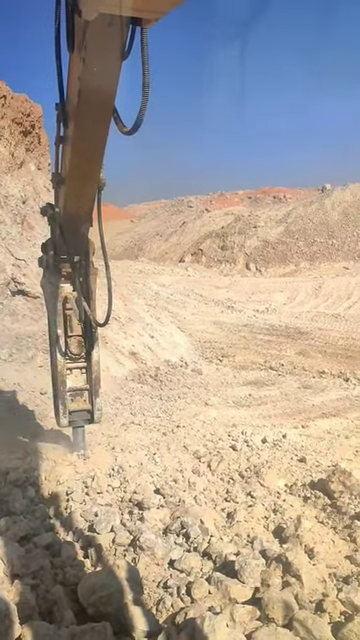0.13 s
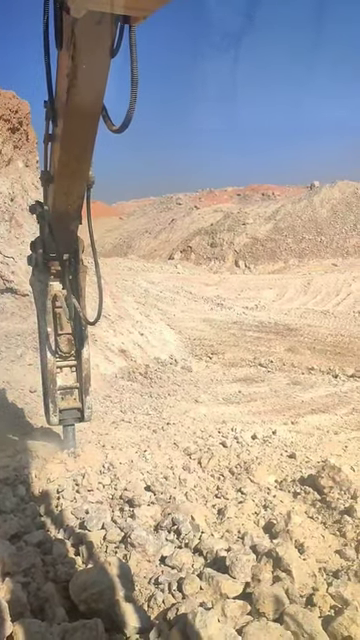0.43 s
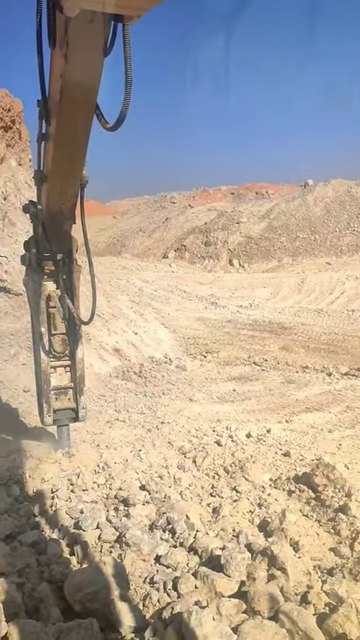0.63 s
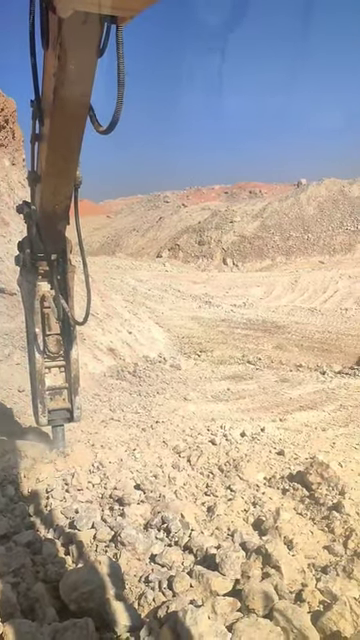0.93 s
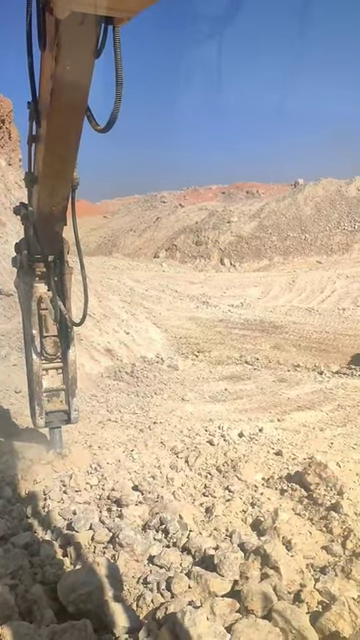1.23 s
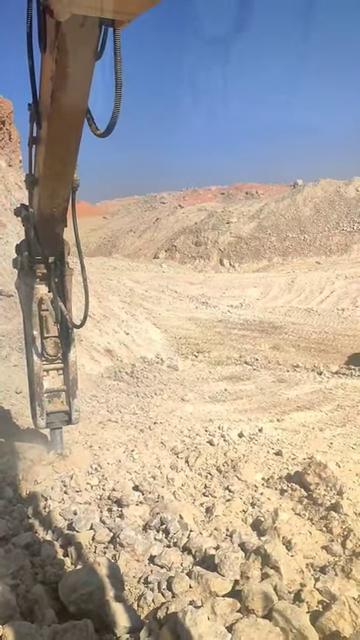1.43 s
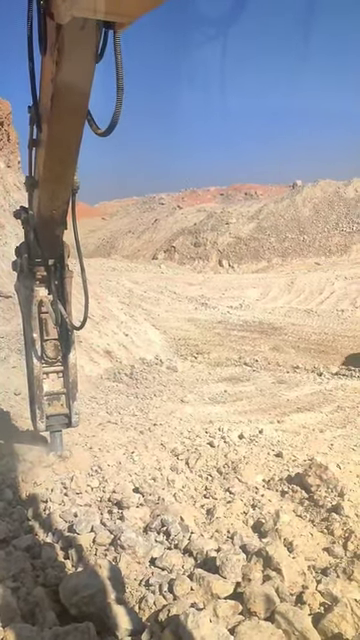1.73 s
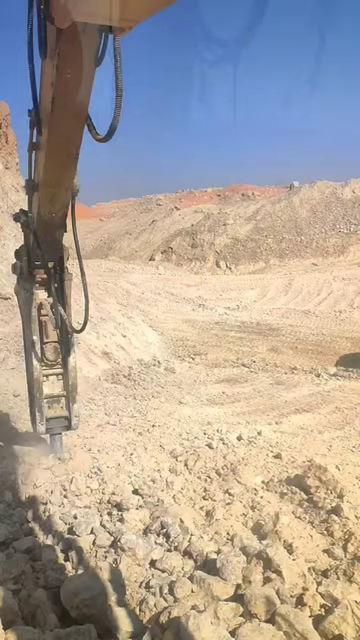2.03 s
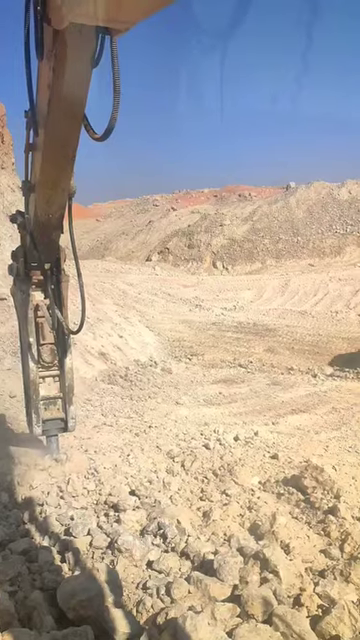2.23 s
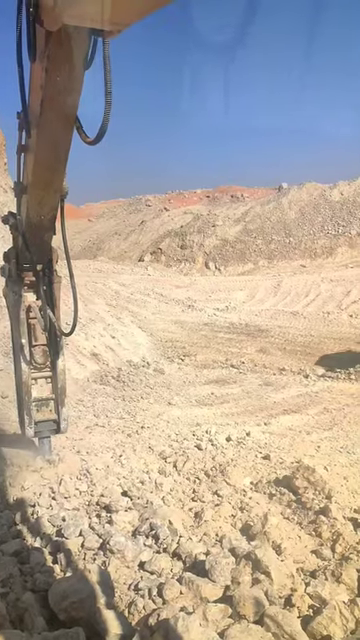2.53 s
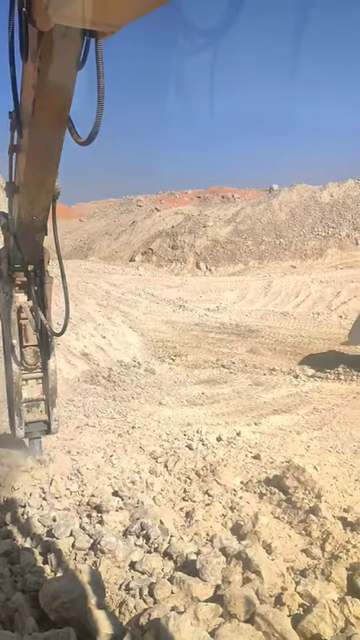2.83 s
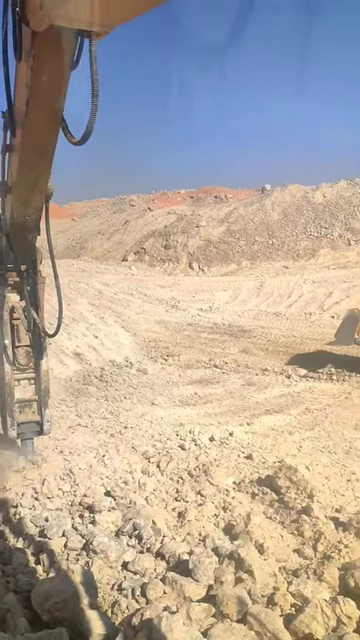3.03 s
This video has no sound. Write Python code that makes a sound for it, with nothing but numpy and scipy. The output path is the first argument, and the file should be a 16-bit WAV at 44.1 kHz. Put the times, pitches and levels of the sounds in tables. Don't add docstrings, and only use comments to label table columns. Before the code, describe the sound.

A hydraulic breaker hammers rock without pause for about 3.2 seconds, eight blows a second, heard in the closed excavator cab. Each blow is a deep boomy thump with a short coarse clatter of housing, panels and door. Steel rings thinly on the rebound and a pin sings high between blows. From about 1.9 seconds the rock splits; clatter strengthens and becomes choppier. Diesel and pump drone low throughout.

```python
import sys
import numpy as np
from scipy import signal
from scipy.fft import rfft, irfft, next_fast_len
from scipy.io import wavfile
from scipy.ndimage import uniform_filter1d, map_coordinates

SR = 44100
rng = np.random.default_rng(int(sys.argv[2]) if len(sys.argv) > 2 else 0)


def output_pcm(signal):
    pcm = np.clip(np.atleast_2d(signal).T, -1, 1) * 32767
    wavfile.write(sys.argv[1], SR, np.round(pcm).astype(np.int16))


def amplitude_ratio(level_db):
    exponent = np.asarray(level_db, float) / 20
    return 10 ** exponent


N = 140238
TIME = np.arange(N) / SR


def unit(x):
    return x / np.sqrt(np.mean(x ** 2) + 1e-20)


def along(points, hz):
    f, v = np.transpose(points)
    return np.interp(np.log(hz + 1), np.log(f + 1), v)


def wobble(rate):
    knots = rng.standard_normal(int(N * rate / SR) + 4)
    return map_coordinates(knots, [np.arange(N) * rate / SR])


def filtered(x, response):
    m = next_fast_len(N + SR // 2)
    return irfft(rfft(x, m) * response(np.fft.rfftfreq(m, 1 / SR)), m)[..., :N]


def rung(x, response):
    size = np.sqrt(np.mean(np.abs(response(np.fft.rfftfreq(SR, 1 / SR))) ** 2))
    return filtered(x, response) / size


def ringing(peaks):
    def response(f):
        total = 0
        for k, (centre, width, db) in enumerate(peaks):
            loss = 1j * f * width
            total = total + (-1) ** k * amplitude_ratio(db) * loss / (centre * centre - f * f + loss)
        return total
    return response


# (time [s], looseness [0 firm - 1 loose])
ROCK_GIVE = [
    (0, 0.18),
    (1.3, 0.067),
    (1.9, 0.45),
    (2.15, 0.9),
    (3.18, 0.7),
]


def give(s):
    return np.clip(np.interp(s, *np.transpose(ROCK_GIVE)), 0, 1)


# (time [s], clatter level [dB], panel level [dB], tool ring level [dB])
BLOWS = [(-0.062, -36.5, -60, -43), (0.059, -37.5, -32, -51.5), (0.18, -37, -33, -52),
         (0.3, -38.0, -34, -52.5), (0.417, -37.5, -33.5, -53), (0.537, -38, -32.5, -53),
         (0.656, -40, -34, -54.5), (0.777, -37.5, -33, -54), (0.899, -39, -35.5, -57),
         (1.019, -38, -34, -58), (1.139, -38, -35.5, -56), (1.261, -39, -38, -55),
         (1.384, -39.5, -43.5, -58), (1.507, -38.5, -39.5, -53), (1.628, -39, -40, -53.5),
         (1.755, -39, -44, -50), (1.877, -38.5, -37, -54), (2.004, -36, -36, -55), (2.131, -37, -35, -52.5),
         (2.256, -35.5, -31, -49.5), (2.381, -36, -39, -50), (2.512, -36, -37, -50),
         (2.633, -35, -39, -48.5), (2.763, -36, -33, -56), (2.888, -36, -54, -54.5),
         (3.014, -35.5, -35, -49), (3.136, -37, -47, -52)]
# (frequency [Hz], t60 [s], level [dB], lag [s])
SWING_FIRM = [(13.5, .6, -10.3, .0504), (22.5, .21, -11.5, .0212), (35.7, .6, -15.6, .0176),
              (40.3, .6, -13.9, .0186), (50.5, .3, -19.3, .0087), (64.2, .29, -19.6, .01),
              (74.5, .52, -14.6, .0073), (83.1, .6, -24, .0038), (102, .41, -25.1, .0021)]
# (frequency [Hz], t60 [s], level [dB], lag [s])
SWING_CRACKING = [(13.5, .6, -8.2, .0434), (26.3, .6, -16.9, .0214), (31.6, .6, -17.2, .0103),
                  (39.6, .6, -17, .0172), (54.4, .6, -22, .002), (70.4, .6, -20.1, .0136),
                  (72.7, .6, -19, .0078), (88, .6, -26.4, .0063), (112.3, .6, -27.9, .0029)]
# (frequency [Hz], t60 [s], level [dB], lag [s])
SWING_LOOSE = [(13.5, .53, -7.6, .0362), (27.1, .6, -23.4, .0208), (31.7, .6, -16.3, .0103),
               (39.2, .6, -13.3, .0142), (65.7, .6, -25.3, .0076), (72, .6, -24.8, .0055),
               (94.1, .6, -27.2, .0087)]
# (frequency [Hz], t60 [s], level [dB], lag [s])
FLOOR_PLATE = [(164.5, 0.37, -34, 0.0019), (214.4, 0.25, -33, 0.00061), (249.8, 0.4, -32, 0.0021)]
CRACKING_S = [
    1.7,
    1.9,
    2.28,
    2.4,
]


def swing():
    swell_s, blow_gap_s = .012, .12
    t = np.arange(SR * 2 // 3) / SR
    earlier = [BLOWS[0][0] - k * blow_gap_s for k in (1, 2, 3)]
    hits = np.zeros(N + SR)
    hits[[round((s + 1) * SR) for s in earlier + [row[0] for row in BLOWS]]] = 1
    cracking = np.interp(TIME, CRACKING_S, [0, 1, 1, 0])
    loose = np.interp(TIME, CRACKING_S[2:], [0, 1])
    firm = 1 - cracking - loose
    out = 0
    for modes, share in ((SWING_FIRM, firm), (SWING_CRACKING, cracking), (SWING_LOOSE, loose)):
        shape = 0
        for hz, t60, db, lag in [*modes, *FLOOR_PLATE]:
            shape = shape + amplitude_ratio(db - 60 * t / t60) * np.sin(2 * np.pi * hz * (t - lag))
        shape = shape * (1 - np.exp(-t / swell_s))
        out = out + share * signal.fftconvolve(hits, shape)[SR:SR + N]
    return amplitude_ratio(1 + 0.25 * wobble(8.94)) * out


# (time [s], hold [s])
HOLD = [
    (0, 0.058),
    (1.9, 0.068),
    (2.35, 0.065),
    (2.6, 0.048),
    (3.18, .034),
]


def rattle(column, blow_db, rebound_db, lumpy_db, lumps, rows=BLOWS):
    lead_s, attack_s = 0.011, .023
    release_db_per_s, tail_db, tail_db_per_s = 602, -12, 174
    sag_firm, sag_loose = 63, 189
    rebound_s, rebound_spread_s, rebound_len_s = 0.045, 0.01, 0.0074
    s, level_db = np.transpose(rows)[[0, column]]
    luck = rng.standard_normal((len(s), 2))
    gain = np.zeros(N)
    for s0, db, (late, strong) in zip(s, level_db, luck):
        at = slice(max(round((s0 - lead_s) * SR), 0), round((s0 + .2) * SR))
        t = TIME[at] - s0
        after = np.clip(t - np.interp(s0, *np.transpose(HOLD)), 0, 1)
        sag = sag_firm + (sag_loose - sag_firm) * give(s0)
        attack = np.sin(np.pi / 2 * np.clip((t + lead_s) / attack_s, 0, 1)) ** 2
        hold = amplitude_ratio(blow_db - sag * t) * attack
        from_rebound = (t - rebound_s - rebound_spread_s * late) / rebound_len_s
        bump = amplitude_ratio(rebound_db + 0.53 * strong) * np.exp(-.5 * from_rebound ** 2)
        release = amplitude_ratio(-release_db_per_s * after) + amplitude_ratio(tail_db - tail_db_per_s * after)
        gain[at] += amplitude_ratio(db) * release * (hold + bump)
    lumpy = unit(amplitude_ratio(lumpy_db * wobble(lumps)))
    return gain * lumpy * rng.standard_normal((2, N))


def cab(x):
    t60_s, tail_db = .08, -8
    t = np.arange(SR // 5) / SR
    tail = rng.standard_normal((2, len(t))) * amplitude_ratio(-60 * t / t60_s)
    return x + amplitude_ratio(tail_db) * signal.fftconvolve(x, tail / np.linalg.norm(tail[0]), axes=1)[:, :N]


# (frequency [Hz], level [dB per Hz])
CLATTER = [(120, -120), (300, 10), (950, 6), (1150, -3), (2200, -2.5), (3200, 2.5), (3500, -6.5),
           (14000, -25)]
# (frequency [Hz], width [Hz], level [dB])
HOUSING = [(1085, 40, -3), (1385, 80, -4), (1642, 35, 2), (1980, 30, -6), (2500, 35, -5), (2695, 40, -4),
           (2865, 60, -4), (2965, 30, -6), (3045, 35, -5), (3610, 45, -6), (4020, 180, -13),
           (5140, 150, -14)]
# (frequency [Hz], width [Hz], level [dB])
PANELS = [(373, 28, -10.5), (401, 24, -5), (449, 20, 3.5), (504, 37, -4), (545, 21, -3), (643, 16, -1),
          (688, 21, -12), (741, 11, 1)]
# (time [s], peak level [dB], mean level [dB])
THUMPS = [(0.058, -26, -27), (0.178, -15, -27.5), (0.299, -25, -29), (0.416, -24, -30), (0.536, -26, -30),
          (0.656, -26, -26.5), (0.776, -27, -27.5), (0.896, -32, -28.5), (1.018, -23, -29.5),
          (1.138, -24, -34), (1.26, -24, -29.5), (1.381, -29, -33), (1.505, -28, -31.5),
          (1.625, -29, -32.5), (1.754, -28, -33), (1.876, -27, -35), (2.003, -23, -29), (2.131, -25, -28),
          (2.254, -23, -25.5), (2.38, -24, -30), (2.511, -22, -24.5), (2.63, -21, -26.5),
          (2.762, -24, -31.5), (2.887, -21, -25), (3.012, -20, -25), (3.134, -24, -28)]


def breaker():
    shake = rattle(column=1, blow_db=0.6, rebound_db=-46, lumpy_db=1.5, lumps=180)
    clatter = amplitude_ratio(6) * rung(shake, lambda f: amplitude_ratio(along(CLATTER, f)))
    shake = rattle(column=1, blow_db=3.0, rebound_db=-22.0, lumpy_db=3.0, lumps=120)
    housing = amplitude_ratio(-4.0) * rung(shake, ringing(HOUSING))
    shake = rattle(column=2, blow_db=-2.0, rebound_db=-22.5, lumpy_db=1.5, lumps=110, rows=THUMPS)
    panels = amplitude_ratio(-4.5 + 0.88 * give(TIME)) * rung(shake, ringing(PANELS))
    low = filtered(panels, lambda f: f < 480)
    low_gain = amplitude_ratio(2.5 * (2 * give(TIME) - 1)) - 1
    return cab(clatter + housing) + panels + low_gain * low


# (frequency [Hz], level on firm rock [dB], loss while driven [dB per s])
DOOR = [
    (849, 3.5, -45),
    (942, 4.5, 198),
]


def door():
    rise_s, hold_s, damping_db_per_s = 0.0074, 0.041, 459
    shift_db = 7.5
    out = np.zeros((2, N + 2 * SR))
    t = np.arange(SR // 6) / SR
    luck = rng.standard_normal((len(BLOWS), 4))
    for (s, _, db, _), chance in zip(BLOWS, luck):
        loose = give(s)
        decay = amplitude_ratio(db - 210 * loose * t - damping_db_per_s * np.clip(t - hold_s, 0, 1))
        shape = (1 - np.exp(-t / rise_s)) * decay
        at = round((s + 1) * SR)
        for k, (hz, level, loss_db) in enumerate(DOOR):
            turn = 2 * np.pi * hz * (1 + 0.0016 * chance[k]) * (t - .0015) + 0.26 * chance[k + 2]
            shift = shift_db * loose * (2 * k - 1.5)
            size = amplitude_ratio(level + shift + 0.51 * chance[k + 2] - loss_db * t)
            out[:, at:at + len(t)] += size * shape * np.array([np.sin(turn), np.cos(turn)])
    return amplitude_ratio(2.5 + 2.5 * wobble(110)) * out[:, SR:SR + N]


def chatter(db):
    return amplitude_ratio(db) * unit(amplitude_ratio(2.3 * wobble(70))) * rng.standard_normal((2, N))


# (frequency [Hz], width [Hz], level [dB])
TOOL = [(6061, 18, 0), (7515, 45, -12)]
# (frequency [Hz], width [Hz], level [dB])
PIN = [(3177, 16, 0), (3143, 20, -5), (3205, 30, -8)]
# (time [s], level [dB])
PIN_CHATTER = [
    (0, -54),
    (.35, -53),
    (.86, -58),
    (1.4, -57),
    (1.86, -53),
    (2.11, -50),
    (2.5, -53),
    (3.18, -54),
]


def tool():
    pin_hz, wander_rad, pin_loose_db = 3177, .6, 1.5
    ring = rattle(column=3, blow_db=5.5, rebound_db=2.0, lumpy_db=0.0, lumps=130) + chatter(-73)
    shake = rattle(column=1, blow_db=-7.5, rebound_db=-35, lumpy_db=1.5, lumps=150) + chatter(-61.5)
    turn = 2 * np.pi * pin_hz * TIME + wander_rad * wobble(30.8)
    sing_db = np.interp(TIME, *np.transpose(PIN_CHATTER)) + 1.5 * wobble(44)
    sing = amplitude_ratio(sing_db) * np.array([np.sin(turn), np.cos(turn)])
    pin = amplitude_ratio(pin_loose_db * give(TIME)) * rung(shake, ringing(PIN))
    return amplitude_ratio(1.2) * rung(ring, ringing(TOOL)) + pin + sing


# (frequency [Hz], level [dB per Hz])
DRONE = [(20, 3), (110, 2), (270, -8), (900, -13.5), (1150, -25), (3000, -31), (8000, -41), (14000, -61)]
# (frequency [Hz], width [Hz], level [dB rms])
ENGINE = [(166.9, 4.7, -39.5), (249.4, 6.5, -41.5), (219.4, 7.5, -42.5), (2513, 39, -61)]


def engine():
    z = signal.stft(rng.standard_normal((2, N)), nperseg=512)[2]
    field = uniform_filter1d(rng.standard_normal(z.shape[1:]), size=5, axis=0)
    field = uniform_filter1d(field, size=8, axis=1)
    noise = signal.istft(z * amplitude_ratio(2.1 * unit(field)), nperseg=512)[1][:, :N]
    out = amplitude_ratio(-28.5) * unit(filtered(noise, lambda f: amplitude_ratio(along(DRONE, f))))
    for hz, width, db in ENGINE:
        resonance = ringing([(hz, width, 0)])
        tone = filtered(rng.standard_normal((2, N)), lambda f: resonance(f) ** 2)
        out = out + amplitude_ratio(db) * unit(tone)
    return out


# (frequency [Hz], left-right correlation [-1 to 1])
ALIKE = [(60, 0.75), (180, 0.97), (520, 0.66), (1550, -0.2), (4590, -0.22), (13600, 0.21)]
# (frequency [Hz], left over right [dB])
LEAN = [(60, 5.5), (280, -1), (610, 2.5), (1330, -1), (2880, -4.5), (6260, -3), (9000, -0.5), (13600, -1.5)]


def pair(x):
    def mid_side(hz):
        turn = np.arccos(np.clip(along(ALIKE, hz), -1, 1)) / 2
        return np.array([np.cos(turn), np.sin(turn)])
    mid, side = filtered(x, mid_side)
    sides = np.array([mid + side, mid - side])
    return filtered(sides, lambda hz: amplitude_ratio(np.outer([.5, -.5], along(LEAN, hz))))


def scene():
    left_lag = 10
    low = swing()
    ports = np.array([np.pad(low, (left_lag, 0))[:N], low])
    ports = ports * amplitude_ratio(.35 * np.outer([1, -1], wobble(48)))
    return ports + pair(breaker() + door() + tool() + engine())


def low_pass(x):
    return signal.sosfilt(signal.butter(12, 14200, fs=SR, output="sos"), x)


def record(dry):
    low_cut_hz = 5
    mix = filtered(dry, lambda f: 1 - 1 / (1 + (f / low_cut_hz) ** 4))
    return low_pass(mix)


dry = scene()
out = record(dry)
output_pcm(out)
```